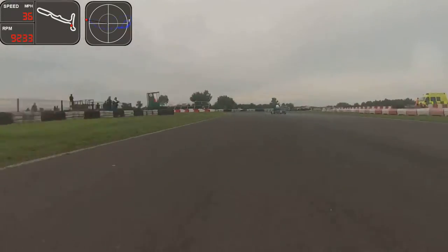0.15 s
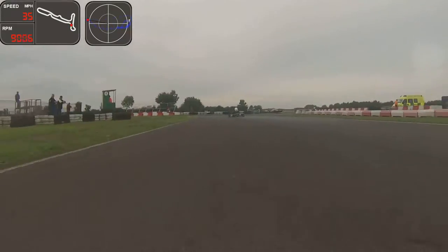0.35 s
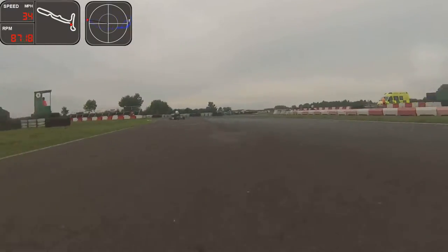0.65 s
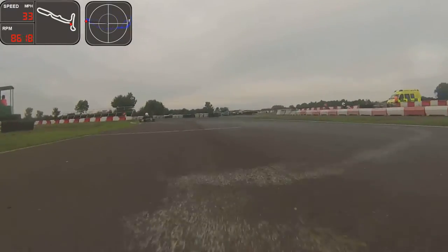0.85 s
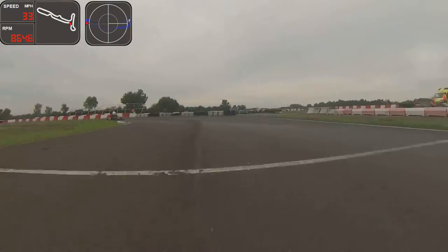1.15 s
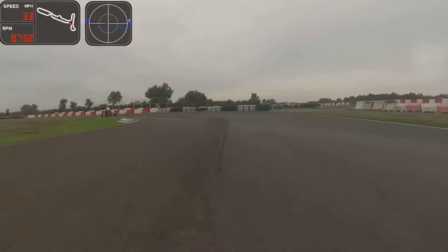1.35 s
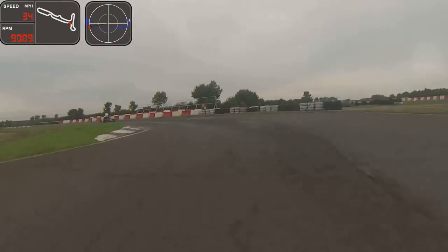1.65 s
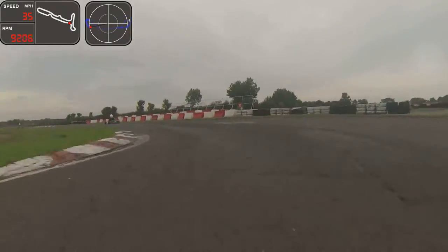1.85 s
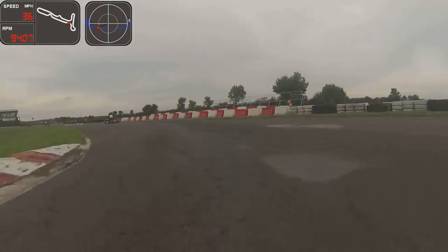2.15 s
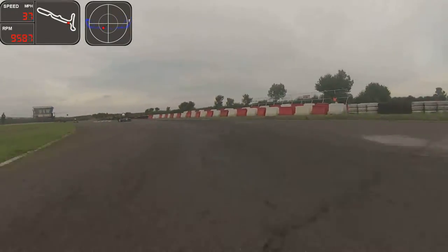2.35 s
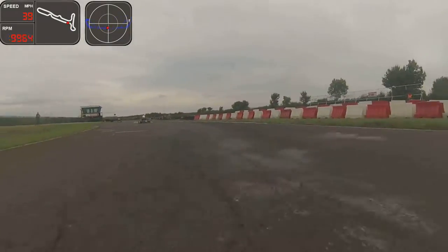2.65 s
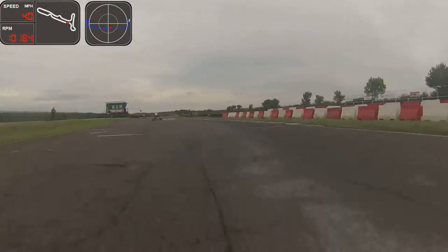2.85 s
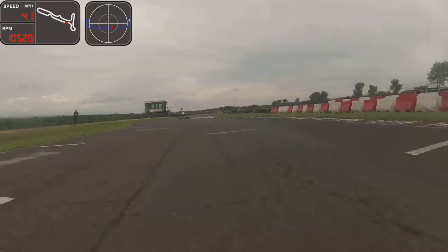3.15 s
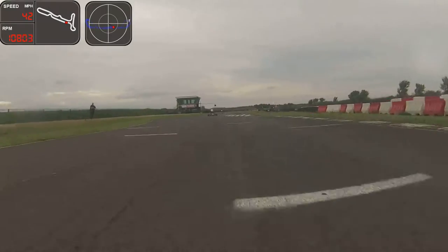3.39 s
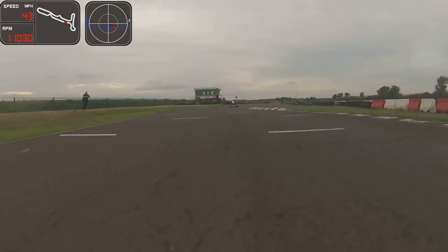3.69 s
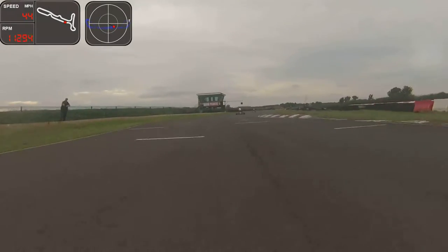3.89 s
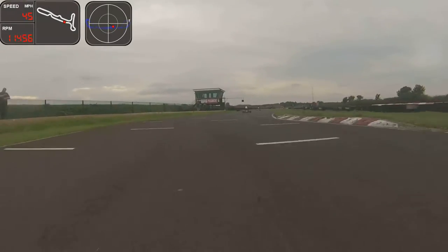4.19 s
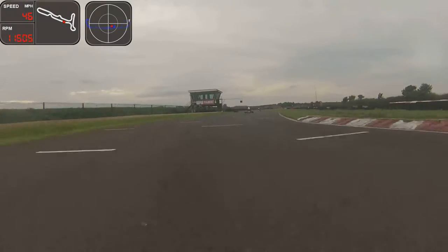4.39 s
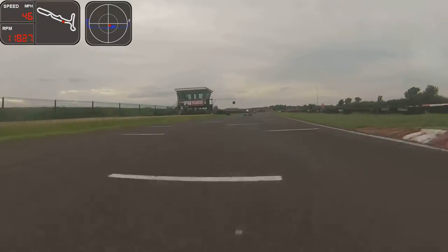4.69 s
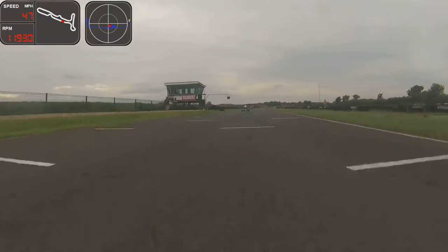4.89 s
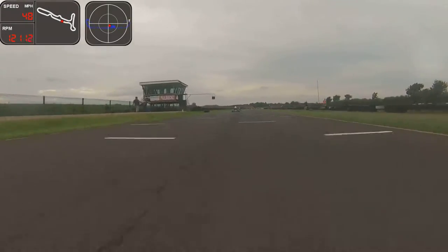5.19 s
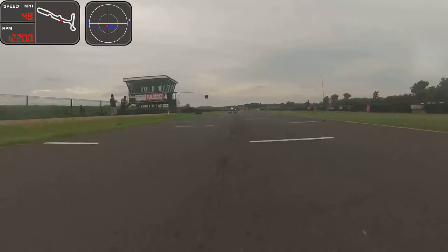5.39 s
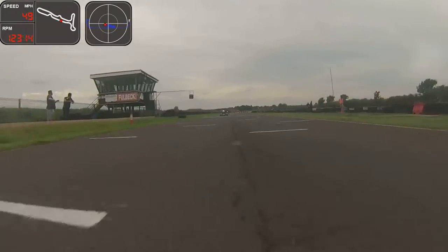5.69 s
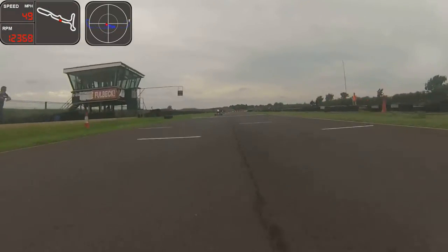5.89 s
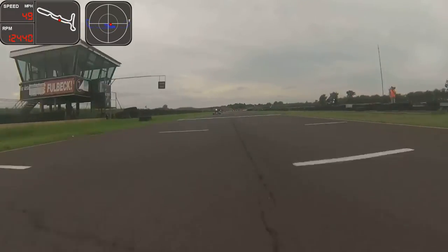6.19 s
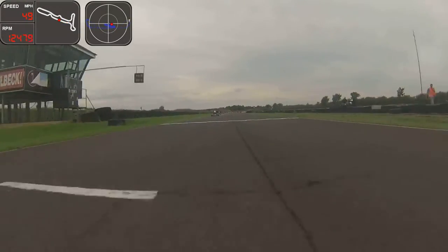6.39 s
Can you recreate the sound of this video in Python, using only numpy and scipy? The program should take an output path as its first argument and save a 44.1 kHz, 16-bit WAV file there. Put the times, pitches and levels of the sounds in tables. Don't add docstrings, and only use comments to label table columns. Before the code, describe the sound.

A racing kart is heard from a microphone sealed in a hard housing on its frame, so the sound is close, dry, boxy and short of treble. From 0 to 1 second the small two-stroke engine climbs in pitch, a dense nasal buzz with panel rattle, with strong clacks near 0.1 and 0.8. Just after 1 second the throttle eases and the engine becomes quieter and rougher, its pitch sagging until about 2.5 as thuds, clacks and gritty ticks stand out. Then it pulls again, rising steadily and growing firmer and louder to the end at 6.5. Low frame boom and tyre roar continue throughout. Bumps cluster between 2.8 and 3.6; the hardest jolt at 3.5 makes everything duck briefly before recovering. More clacks follow at 3.9, 4.4, 5.1 and, sharply, 6.1, while the engine keeps climbing without a break.

```python
import sys
import numpy as np
from scipy import signal
from scipy.fft import rfft, irfft
from scipy.io import wavfile
from scipy.ndimage import uniform_filter1d, minimum_filter1d

SR = 44100
rng = np.random.default_rng(int(sys.argv[2]) if len(sys.argv) > 2 else 0)


def linear_from_db(decibels):
    return 10 ** (np.asarray(decibels, float) / 20)


def waveform_to_disk(signal):
    frames = np.transpose(np.atleast_2d(signal))
    scaled = np.clip(frames, -1, 1) * 32767
    samples = np.round(scaled).astype(np.int16)
    wavfile.write(sys.argv[1], SR, samples)


N = 288398
TIME = np.arange(N) / SR


def unit(x):
    return x / np.sqrt(np.mean(x ** 2))


def curves(table):
    s, *columns = np.transpose(table)
    return [np.interp(TIME, s, column) for column in columns]


def db_at(table, hz):
    f, db = np.transpose(table)
    f = np.r_[f[0] / 1.4, f, f[-1] * 1.3]
    db = np.r_[db[0] - 40, db, db[-1] - 40]
    return np.interp(np.log(hz + 1), np.log(f), db)


def colour(x, table):
    size = 8192
    cepstrum = irfft(np.log(linear_from_db(db_at(table, np.arange(size // 2 + 1) * SR / size))))
    cepstrum[1:size // 2] *= 2
    cepstrum[size // 2 + 1:] = 0
    response = irfft(np.exp(rfft(cepstrum)))[:size // 2]
    return unit(signal.fftconvolve(x, response)[:N])


def ring(x, hz, width_hz):
    return signal.lfilter(*signal.iirpeak(hz, hz / width_hz, fs=SR), x)


def walk(rate):
    k = int(SR / rate)
    steps = np.repeat(rng.standard_normal(N // k + 1), k)
    return unit(uniform_filter1d(uniform_filter1d(steps, k), k)[:N])


def knocks(events, modes, push_s):
    out, t = np.zeros(N + SR), TIME[:SR // 20]
    for s, db in events:
        push = rng.standard_normal(len(t)) * np.exp(-t / push_s)
        knock = 0
        for hz, width_hz, mode_db in modes:
            twice = ring(ring(push, hz, width_hz), hz, width_hz)
            knock = knock + linear_from_db(mode_db) * ring(twice, hz, 2 * width_hz)
        start = int(s * SR)
        out[start:start + len(t)] += linear_from_db(db) * knock / np.abs(knock).max()
    return out[:N]


# time in seconds, firings per second in Hz.
REVS = [(0.0, 139.2), (0.58, 148.9), (0.82, 155.3), (1.05, 160.4), (1.42, 154.3), (1.8, 147.2),
        (2.1, 144.3), (2.4, 143.9), (2.68, 145.0), (2.95, 149.8), (3.5, 157.6), (4.0, 167.2), (4.62, 178.2),
        (5.0, 184.7), (5.6, 192.6), (5.92, 196.4), (6.37, 200.7), (6.54, 202.1)]
# time in seconds, engine load in dB, share of clean overtones in dB.
THROTTLE = [(0, -5, 0), (.35, -1, -0.5), (1.03, 0.5, 3), (1.15, -6.5, -8.5), (1.5, -5, -8.5),
            (1.8, -6, -3.5), (2.1, -4.5, -9), (2.7, -1, -2.5), (3.1, -3, -5), (3.45, -0.3, -1.5),
            (3.75, -1.7, 3), (4.2, -0.5, 0), (4.7, -0.7, 2), (5.2, 3, -0.3), (5.6, 0, -1), (6.05, 2, -3),
            (6.54, 1, -3.5)]
# firing rate in Hz, level in dB.
MOUNT = [(139, -39), (148, -30), (158, -31), (166, -30), (172, -26.5), (182, -21.5), (195, -20), (202, -17)]
# level in dB of each overtone, 2 to 28 times the firing rate.
FIRING_DB = [-1, 1, -1, 2, 5, -3, -5.5, -6, 0, 0, -0.5, -2, -6.5, -0.5, -3.5, -0.5, 0, -1, -4, -7, -3.5,
             -4.5, -3, -8.5, -5.5, -4.5, -3]
# frequency in Hz, level in dB.
HOUSING = [(285, -4), (330, -27), (400, -5.5), (450, -12), (560, -37), (730, -13), (880, -36), (1010, -29),
           (1110, -13), (1180, -8.5), (1280, -2.5), (1450, 5.5), (1570, -7.5), (1750, -30)]
# frequency in Hz, level in dB.
PANEL_TOPS = [(1850, -29), (1980, 1), (2100, -7.5), (2230, -7.5), (2380, -16), (2500, -10.5), (2620, -27),
              (2950, -15.5), (3250, -33.5), (3520, -19), (3700, -25), (3850, -38), (4200, -33.5),
              (4500, -30.5)]
# frequency in Hz, level in dB per Hz.
BUZZ = [(560, -48), (950, -15), (1040, -18.5), (1160, -1.5), (1440, 3.5), (1510, 0), (1690, -15),
        (1850, -32), (1900, -25), (2470, -46.5), (4180, -120)]
# frequency in Hz, level in dB per Hz.
PANEL_RATTLE = [(1060, -37.5), (1800, -9.5), (1860, -9.5), (1930, -13.5), (2030, -1.5), (2290, -8),
                (2500, -2), (2600, -6.5), (2760, -19.5), (3320, -25.5), (3400, -25), (4420, -44.5),
                (7480, -120)]
# frequency in Hz, level in dB per Hz.
SEAL = [(3250, -26.5), (3500, 2), (3800, -8), (4170, -5), (4600, -12), (5300, -11.5), (6100, -12),
        (6900, -16.5), (8200, -17)]


def engine(dust_db, heave_db):
    (hz,) = curves(REVS)
    load_db, clean_db = curves(THROTTLE)
    first_db = db_at(MOUNT, hz - 1)
    buzz_db = -22.5 + load_db + 1.1 * walk(24)
    panel_db = -33.5 + 0.44 * load_db + 0.1 * heave_db + 0.9 * walk(22)
    leak_db = -65 + 0.78 * load_db + dust_db + 1.2 * walk(12)

    phase = 2 * np.pi * np.cumsum(hz * (1 + 0.001163 * walk(40))) / SR
    coarse = slice(0, N, 128)
    drift, flutter = walk(4.034)[coarse], walk(35)[coarse]
    tones = np.sqrt(2) * linear_from_db(first_db + 0.5 * walk(8)) * np.sin(phase)
    for k, order_db in enumerate(FIRING_DB, start=2):
        f = k * hz[coarse]
        body = linear_from_db(buzz_db[coarse] + db_at(HOUSING, f))
        body = body + linear_from_db(panel_db[coarse] + db_at(PANEL_TOPS, f))
        flex_db = 1.0 * np.roll(drift, 311 * k) + 2.5 * np.roll(flutter, 173 * k)
        size = body * linear_from_db(order_db + clean_db[coarse] + flex_db)
        size = np.interp(TIME, TIME[coarse], size)
        tones += size * np.sin(k * phase + 2 * np.pi * rng.random())

    gate = linear_from_db(3.1 * np.cos(phase) + walk(40) + 2.4 * walk(120))
    buzz = linear_from_db(buzz_db - 2.5) * colour(gate * rng.standard_normal(N), BUZZ)
    panel = linear_from_db(panel_db - 1.5) * colour(gate * rng.standard_normal(N), PANEL_RATTLE)
    leak_level = linear_from_db(np.clip(leak_db, -72, -61) + 10.5 + walk(25))
    leak = leak_level * colour(gate * rng.standard_normal(N), SEAL)
    return tones + buzz + panel + leak


# pitch in Hz, wander of the pitch in Hz, level of free shaking in dB.
FRAME = [
    (27.88, 18, -7),
    (56.4, 4.5, -4),
]
# frequency in Hz, level in dB per Hz.
ROAD = [(53, -30.5), (90, -1.5), (150, -6), (222, -3.5), (313, -11), (355, -6.5), (496, -21.5),
        (731, -19.5), (874, -24.5), (1100, -20), (1430, -44), (2420, -120)]


def chassis(rough_db, grain_db, heave_db, dip_db):
    patchy_db, frame_lag_s = 0.97, 0.035
    late_heave_db = np.roll(heave_db, int(frame_lag_s * SR))
    shake_db = rough_db + 0.4 * late_heave_db + 0.47 * dip_db
    bounce_db = -20.5 + shake_db + patchy_db * walk(20)
    bend_db = -22.5 + shake_db + patchy_db * walk(9)
    road_db = -29 + grain_db + 0.45 * heave_db + 0.27 * walk(6)

    swings = 0
    for (hz, wander_hz, free_db), db in zip(FRAME, (bounce_db, bend_db)):
        swing = np.sqrt(2) * np.sin(2 * np.pi * np.cumsum(hz + wander_hz * walk(9)) / SR)
        free = unit(ring(ring(rng.standard_normal(N), hz, hz / 2), hz, hz / 2))
        swings = swings + linear_from_db(db + 1.27) * (swing + linear_from_db(free_db) * free)
    stones = linear_from_db(0.76 * walk(22) + 1.9 * walk(70))
    return swings + linear_from_db(road_db + 3.0) * colour(stones * rng.standard_normal(N), ROAD)


# time in seconds, overload in dB.
JOLTS = [(0.101, 4.5), (.62, 4), (0.831, 5), (1.2, 3.5), (1.7, 6.5), (1.8, 2.5), (2.291, 2.5), (2.522, 6.5),
         (2.838, 4), (3.022, 2), (3.521, 10.5), (3.81, 5), (4.068, 4.5), (4.3, 2), (4.578, 4.5), (4.861, 1),
         (5.051, 5.5), (5.358, 6), (5.772, 2), (5.87, 6.5), (6.392, 5), (.25, 2), (1.31, 0), (3.19, 2),
         (5.11, 1.5), (6.2, -1)]


def jolts():
    heave_s, clamp_s, hold_s, release_s = 0.032, 0.0039, 0.032, 0.081
    s, over_db = np.transpose(JOLTS)[:, :, None]
    coarse_time = TIME[::64]
    late = coarse_time - s
    heave = over_db * np.exp(-((late + heave_s / 2) / heave_s) ** 2)
    clamp = np.clip(late / clamp_s, 0, 1)
    release = np.exp(-np.maximum(late - hold_s, 0) / release_s)
    dip = over_db * clamp * release
    return [np.interp(TIME, coarse_time, v.sum(axis=0)) for v in (heave, dip)]


# time in seconds, peak level in dB.
CLACKS = [(0.115, -10), (0.7274, -8), (0.8002, -9), (1.154, -14), (1.487, -16.5), (1.6003, -18),
          (1.6741, -19), (1.8647, -16.5), (2.1061, -16.5), (2.2129, -33), (2.2501, -28), (2.354, -27),
          (2.4783, -18), (2.6194, -22), (2.7965, -12.5), (3.0664, -12), (3.108, -13.5), (3.2703, -11.5),
          (3.3478, -28), (3.4082, -10), (3.664, -31.5), (3.934, -11), (4.1653, -25), (4.372, -10.5),
          (4.623, -17), (5.0898, -14.5), (5.3517, -16), (5.6915, -20), (5.9413, -20), (6.096, -8)]
# frequency in Hz, width in Hz, level in dB.
CLACK_MODES = [(1334, 330, 18), (1290, 270, -0.5), (2160, 1700, -11.5), (2350, 370, -23)]


def housing_clacks():
    return knocks(CLACKS, CLACK_MODES, push_s=0.00067)


# time in seconds, peak level in dB.
BUMPS = [(1.153, -16.5), (1.392, -17.5), (1.488, -18), (1.531, -15), (1.576, -29), (1.626, -16),
         (1.729, -17.5), (2.042, -16.5), (2.135, -22.5), (2.446, -15.5), (2.479, -25), (2.619, -25),
         (2.802, -10.5), (2.837, -14), (2.948, -18.5), (3.045, -18), (3.123, -14.5), (3.273, -21),
         (3.464, -17), (3.518, -10), (3.554, -19), (3.594, -25), (3.851, -25), (3.909, -21), (3.959, -15.5),
         (4.403, -18), (4.566, -18), (4.693, -14), (5.038, -25), (5.352, -27.5)]
# frequency in Hz, width in Hz, level in dB.
BUMP_MODES = [(192, 130, -3), (378, 300, -8.5), (660, 1000, 18), (1010, 460, 2.5), (2470, 2000, -10.5)]


def tarmac_bumps():
    return knocks(BUMPS, BUMP_MODES, push_s=0.0027)


# time in seconds, peak level in dB.
GRIT = [(0.7944, -56), (1.0048, -49), (1.289, -29.5), (1.486, -34), (1.5319, -30), (1.6272, -56),
        (1.6706, -37.5), (1.7833, -28), (2.0423, -32.5), (2.4409, -29), (2.4566, -27), (2.6217, -37),
        (2.7985, -33), (2.9635, -29.5), (3.0574, -35), (3.273, -39), (3.552, -35), (3.5917, -34.5),
        (4.3104, -56), (4.463, -54), (4.695, -24.5), (4.9743, -35.5), (6.4233, -47)]
# frequency in Hz, width in Hz, level in dB.
GRIT_MODES = [(5960, 1100, -3), (5200, 2900, -7), (3330, 4500, -0.5)]


def grit_ticks():
    return knocks(GRIT, GRIT_MODES, push_s=0.0022)


# time in seconds, ripples in dB, coarse grain in dB, loose dust in dB.
TARMAC = [(0, -1, -2.5, -7), (.3, 2, -4.5, -4), (.55, -1.5, -2, 3), (1.0, -.5, 1, 2.5),
          (1.3, -0.5, 1.5, -5.5), (1.7, 1, 0.5, -0.5), (2.1, 0.5, -0.5, -1.5), (2.55, 1.5, 3.5, -1.5),
          (3.0, 0.5, 1, -3), (3.3, -1.5, 0.5, 3.5), (3.6, -1, 0, 0), (4.1, 1, 0.5, 2.5),
          (4.5, -0.5, -1, -0.5), (5.0, 0, 1.5, -3), (5.2, -1.5, 1.5, 3.5), (5.6, -1, 1.5, -2),
          (6.0, -2.5, .5, 0.5), (6.54, -3.5, 2, -1.5)]


def scene():
    rough_db, grain_db, dust_db = curves(TARMAC)
    heave_db, dip_db = jolts()
    motor = engine(dust_db, heave_db)
    frame = chassis(rough_db, grain_db, heave_db, dip_db)
    hits = tarmac_bumps() + housing_clacks() + grit_ticks()
    return (motor + frame + hits * linear_from_db(dip_db))[None]


TREBLE_EDGES_HZ = [2760, 3100, 3450, 3790, 4130, 4650, 5170, 5690, 6290, 6890, 7580, 8270, 22051]


def mute_faint_treble(x):
    keep_db, fickle_db = -81.5, 3.2
    frames = dict(window="cosine", nperseg=2048, noverlap=1024)
    f, _, z = signal.stft(np.r_[x, x[:-4096:-1]], SR, **frames)
    strict_db = 1.6 * rng.standard_normal(z.shape[1])
    for lo_hz, hi_hz in zip(TREBLE_EDGES_HZ, TREBLE_EDGES_HZ[1:]):
        band = (f >= lo_hz) & (f < hi_hz)
        size = np.sqrt(np.mean(np.abs(z[band]) ** 2, axis=0))
        masked_db = keep_db + np.clip(5200 - lo_hz, 0, 1400) / 280
        limit_db = masked_db + strict_db + fickle_db * rng.standard_normal(len(size))
        z[band] *= size > linear_from_db(limit_db)
    return signal.istft(z, SR, **frames)[1][:N]


def top_cut(x):
    return signal.sosfilt(signal.butter(12, 8290, fs=SR, output="sos"), x)


def record(dry):
    ducked = dry[0] * linear_from_db(-jolts()[1])
    peak = -minimum_filter1d(-np.abs(ducked), size=257)
    held = np.maximum(peak / 0.72, 1)
    limited = ducked / uniform_filter1d(held, size=129)
    mix = mute_faint_treble(limited)[None]
    return top_cut(mix)


dry = scene()
out = record(dry)
waveform_to_disk(out)
```